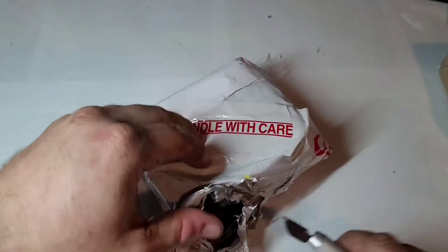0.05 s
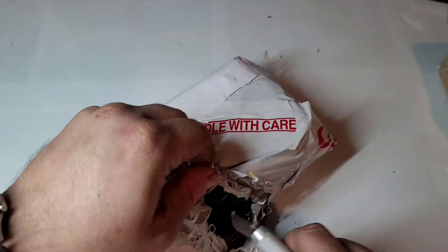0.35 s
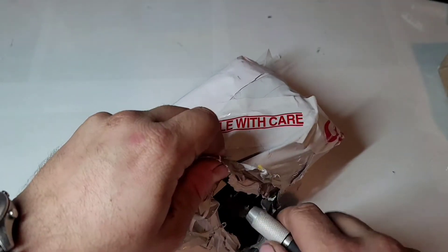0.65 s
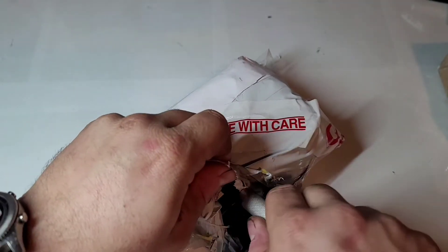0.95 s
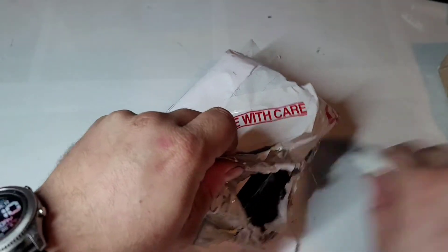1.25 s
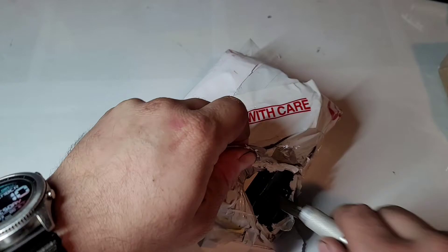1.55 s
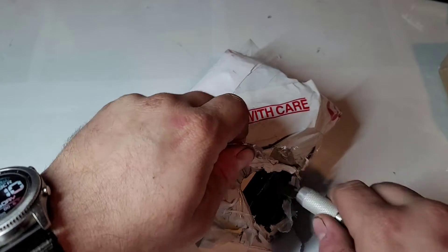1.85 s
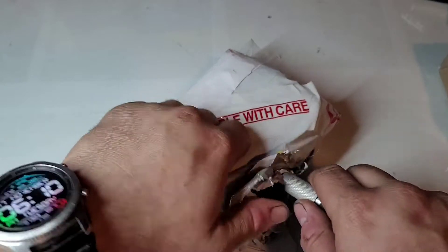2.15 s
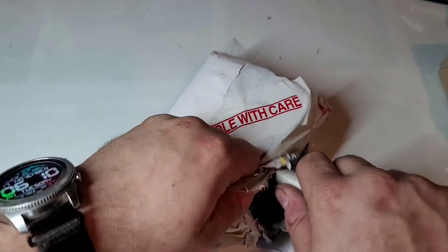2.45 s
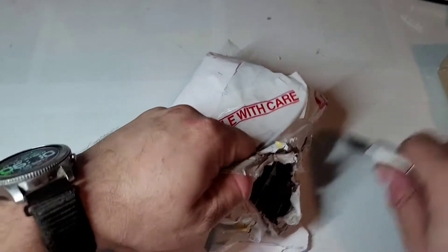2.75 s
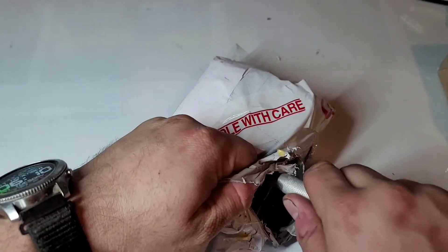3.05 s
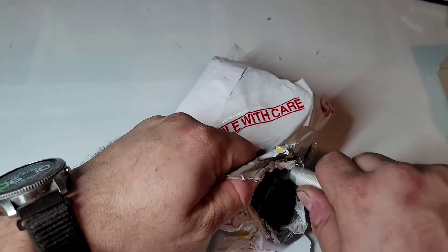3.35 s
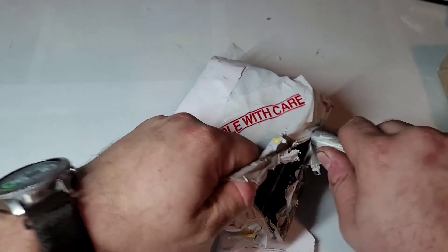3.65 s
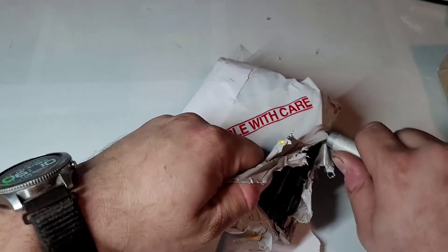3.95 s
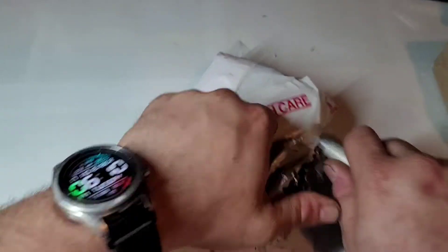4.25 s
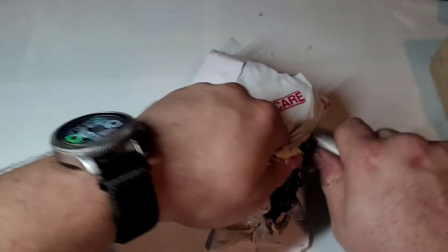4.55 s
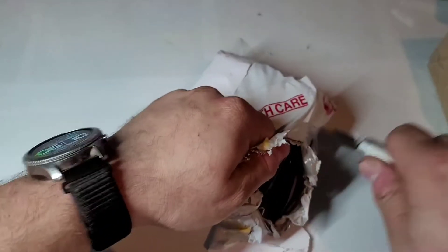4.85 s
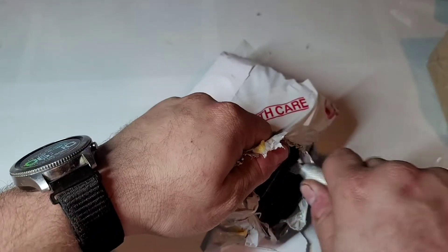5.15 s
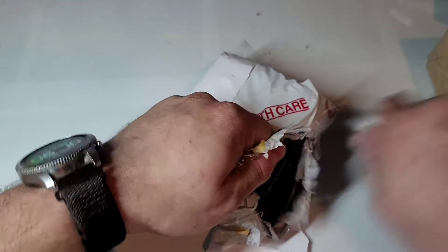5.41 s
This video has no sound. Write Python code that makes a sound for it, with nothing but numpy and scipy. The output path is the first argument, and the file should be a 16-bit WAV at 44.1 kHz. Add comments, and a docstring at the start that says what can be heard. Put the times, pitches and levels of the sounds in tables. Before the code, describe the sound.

A hand grips a padded plastic mailer on a table, making it crinkle unevenly, while a craft knife ticks and scrapes through the stiff padding. Several times the blade hooks the wrapping and pulls until it breaks in a short, sharp rip with a hollow knock. The crackling gets busier in the second half, and two strong rips come near the end. The sound is close, in a small, bare, quiet room.

```python
"""In a small bare room, a padded plastic mailer is held on a table and cut open with a craft knife.
Under the hand the film crinkles by buckling; the blade scrapes and ticks through the card-like padding
by stick-slip friction. Again and again the wrapping fractures in a short rip, an impulse that excites
the resonances of the hollow parcel, thumps the table and reverberates over the room's quiet hush."""
import sys
import numpy as np
from scipy import signal
from scipy.fft import rfft, irfft
from scipy.io import wavfile
from scipy.ndimage import map_coordinates

SR = 44100
rng = np.random.default_rng(int(sys.argv[2]) if len(sys.argv) > 2 else 0)


def int16_out(signal):
    """Quantize to a 16-bit WAV file."""
    q = np.round(np.clip(np.atleast_2d(signal).T, -1, 1) * 32767)
    wavfile.write(sys.argv[1], SR, q.astype(np.int16))


N = 246078
TIME = np.arange(N) / SR

# Spectra of the room's air, its reverberation, the film's crinkle, a single tick and the padding's rasp.
# Each row: frequency in Hz, relative spectral level in dB.
HUSH_SPECTRUM = [(25, 1), (50, 8), (88, 15), (125, -2), (250, 10.5), (500, -4), (1200, -13.5), (3000, 1),
                 (6000, -15), (9000, -59), (15000, -35)]
ROOM_SPECTRUM = [(50, -5), (90, -4), (130, -3.5), (250, 0), (600, 1.5), (1000, -4.5), (1450, 0),
                 (2000, 2.5), (2800, 6.5), (3700, 3.5), (5000, -3), (6500, 2), (9000, 1), (15000, -5)]
CRINKLE_SPECTRUM = [(60, -9), (200, -3), (450, 1.5), (750, -2.5), (1100, -15.5), (2000, -1.5), (3200, 3.5),
                    (6800, -3.5), (8200, -5.5), (9600, -9.5), (12000, -8), (15000, -18.5)]
TICK_SPECTRUM = [(100, -31), (900, -5.5), (2000, 16.5), (3200, 18.5), (6800, 8), (8200, 7), (9600, 3.5),
                 (12000, 5.5), (15000, 0)]
RASP_SPECTRUM = [(100, -55.5), (350, -15), (700, -4), (980, -11), (1220, -1.5), (1650, -1.5), (2300, -7.5),
                 (3500, -19.5), (8000, -32), (15000, -50)]
# Reverberation time. Each row: frequency in Hz, time to decay by 60 dB in seconds.
REVERB_TIMES = [(100, 0.61), (300, 0.46), (1500, 0.68), (3600, 0.85), (7000, 0.58), (9500, 0.46),
                (13000, 0.38)]
# Standing waves of the room. Each row: frequency in Hz, relative level in dB.
STANDING_WAVES = [(89, 9.5), (155, 9.5), (219, 10.5), (392, -33), (613, -18), (866, 6.5)]
# Resonances of the hollow parcel. Each row: frequency in Hz, bandwidth in Hz, relative level in dB.
PARCEL_MODES = [(276.5, 14, -14), (431, 224, 12.5), (596, 104, 6.5)]
# Resonances of the padding. Each row: multiple of the main pitch, bandwidth in Hz, relative level in dB.
PADDING_MODES = [(0.421, 194, -3), (0.702, 220, -2), (1.001, 305, 11), (1.27, 500, -23), (1.85, 600, -30)]
# Resonances of the thin blade. Each row: frequency in Hz, time to decay by 60 dB in seconds, level in dB.
BLADE_MODES = [(4310, 0.086, -50), (11040, 0.034, -47)]
# The table's response to a break. Each row: frequency in Hz, offset from the break's knock level in dB.
TABLE_THUMP = [(92, -21.5), (290, -21)]
# Patches of film. Each row: resonance in Hz, delay to the left microphone in samples.
FILM_PATCHES = [(2500, 8), (3400, 6), (4400, 7), (5700, 4), (6900, 9), (11500, 6)]
# The parcel nudges the table. Each row: start in seconds, pitch in Hz, relative level in dB.
NUDGES = [(0.689, 184, -56.5), (0.822, 92, -54.5), (2.632, 92, -48), (3.535, 220, -50), (3.55, 111, -50.5),
          (3.63, 90, -51), (4.172, 177, -57), (4.311, 96, -56.5), (4.449, 248, -51.5), (4.478, 181, -51.5)]
# The parcel slides under the hand. Each row: start in seconds, length in seconds, level in dB.
SLIDES = [(.015, 0.31, -64), (0.653, 0.22, -64.5), (1.132, 0.045, -65), (1.72, 0.039, -47.5),
          (2.01, 0.11, -58), (3.62, 0.048, -47.5), (3.863, 0.033, -55.5), (4.575, 0.018, -54.5),
          (4.655, 0.03, -41.5)]
# The holding hand keeps the film astir. Each row: time in seconds, crinkle level in dB.
GRIP_LEVELS = [(0, -59), (.5, -71), (1.05, -70.5), (1.7, -80), (1.93, -77), (2.15, -64), (2.58, -57.5),
               (2.9, -75), (3.52, -80), (3.72, -65), (4.08, -61), (4.6, -60), (5.05, -79.5), (5.41, -65.5)]
# The hand squeezes. Each row: peak time in seconds, rise and fall time in seconds, crinkle level in dB.
HAND_SQUEEZES = [(0.011, 0.15, -52.5), (0.237, 0.24, -57), (0.706, 0.19, -60), (0.953, 0.035, -53),
                 (1.74, 0.045, -47), (2.044, 0.12, -51), (2.153, 0.11, -50), (2.341, .17, -50),
                 (3.888, 0.069, -46), (4.207, 0.079, -44.5), (4.392, 0.11, -51.5), (4.524, 0.085, -46),
                 (5.343, .1, -58.5)]
# The blade drags through the padding. Each row: start and length in seconds,
# relative scrape and crinkle levels in dB.
BLADE_DRAGS = [(1.088, 0.0608, -47, -54), (1.161, .048, -37, -42), (3.308, 0.051, -65, -79),
               (3.502, .012, -48.5, -60.5), (4.579, .012, -50, -69)]
# The blade hooks the wrapping and pulls until it tears. Each row: bite and end in seconds,
# relative crinkle and scrape levels during the pull in dB.
BLADE_PULLS = [(1.258, 1.33, -48.5, -51.5), (2.615, 2.691, -43, -47), (3.596, 3.652, -47, -44),
               (4.651, 4.729, -45, -48), (5.434, 5.505, -43.5, -47)]
# Creases flip in the film. Each row: time in seconds, tick level in dB, tick pitch in Hz.
CREASE_FLIPS = [(.065, -50, 7160), (.0949, -48.5, 6900), (.3755, -47, 3180), (.6291, -43.5, 4400),
                (.8308, -45, 6300), (1.6984, -50.5, 3150), (1.9537, -50.5, 4333), (2.13, -49, 6410),
                (2.338, -46, 4100), (2.356, -45, 6340), (2.4323, -46.5, 12400), (2.6141, -41.5, 6194),
                (2.6667, -33.5, 13300), (3.865, -34.5, 4060), (3.8929, -41, 6800), (4.7191, -34, 5450),
                (5.2731, -51, 3420), (5.4296, -39, 6700), (5.5068, -26, 6070)]
# The blade tip catches in the padding. Each row: time in seconds, relative clack level in dB,
# clack pitch in Hz, tick level in dB.
TIP_CATCHES = [(0.0283, -43.5, 760, -49), (.557, -48, 2770, -50), (0.6105, -45, 1630, -53.5),
               (0.6709, -50, 776, -53.5), (1.0782, -39, 2290, -42.5), (1.0855, -30, 2680, -50),
               (1.1648, -37, 1200, -42.5), (1.2728, -35.5, 1930, -37.5), (1.8433, -43.5, 1240, -46.5),
               (1.88, -44.5, 1900, -55), (2.4672, -42, 1380, -51.5), (2.533, -43, 1120, -35),
               (2.545, -39.5, 1310, -44.5), (2.6245, -39.5, 1220, -39), (3.2286, -40.5, 1170, -44),
               (3.29, -17.5, 1243, -34), (3.3024, -29.5, 1540, -54), (3.5944, -33.5, 1292, -55),
               (3.767, -42.5, 1240, -50), (3.9797, -48, 1060, -70), (4.023, -43.5, 1120, -44),
               (4.3436, -37.5, 1298, -44.5), (4.4, -33.5, 2260, -46.5), (4.4418, -41.5, 1320, -57),
               (4.5193, -31.5, 1286, -40), (4.6506, -35.5, 1250, -43), (4.667, -36, 1240, -56),
               (5.4, -45, 1150, -68), (5.4365, -36, 1240, -40), (5.4708, -43, 2534, -35.5)]
# A deeper catch dulls the tick. Each row: the catch's clack level minus tick level in dB, tick pitch in Hz.
TICK_DULLING = [(5, 9100), (13, 1900)]
# The wrapping breaks. Each row: time in seconds, film tick level in dB, relative padding clack level
# in dB, clack pitch in Hz, relative parcel knock level in dB, knock pitch in Hz.
FRACTURES = [(1.3215, -31, -25, 1446, -28.5, 410), (1.3299, -29, -26.5, 890, -27, 375),
             (2.0119, -42, -45, 960, -39, 453), (2.6831, -49, -24, 1340, -20.5, 364),
             (2.6911, -52.5, -26.5, 1030, -30.5, 334), (3.8787, -55, -46.5, 900, -53, 430),
             (4.176, -39.5, -48, 1590, -44.5, 420), (4.2036, -57, -40, 1322, -43, 419),
             (4.7078, -33, -36, 920, -35, 400.7), (4.7273, -27, -21, 1400, -50, 457),
             (4.7315, -22, -33, 910, -20.5, 447), (5.4921, -22, -17.5, 1344, -22.5, 496),
             (5.5067, -35.5, -28, 2070, -22.5, 465)]

LEFT_LAG = 7  # samples
SNAP_GAIN = np.sqrt(.005 * SR)  # a snap's level is its energy averaged over 5 ms


def undb(db):
    """Amplitude ratio of a level in decibels."""
    return 10 ** (np.asarray(db) / 20)


def together(levels_db):
    """Incoherent sources add in power: their joint level in dB."""
    return 10 * np.log10(np.sum(undb(levels_db) ** 2, axis=0) + 1e-14)


def unit_rms(x):
    """Normalise to a mean power of one."""
    return x / np.sqrt(np.mean(x ** 2))


def unit_energy(x):
    """Normalise a short response to an energy of one."""
    return x / np.sqrt(np.sum(x ** 2))


def lookup(table, hz):
    """Interpolate rows of (Hz, value) along a log-frequency axis."""
    table_hz, value = np.transpose(table)
    return np.interp(np.log(np.maximum(hz, 1)), np.log(table_hz), value)


def colour(spectrum, size=2048):
    """Minimum-phase impulse response with the given spectrum."""
    cepstrum = irfft(np.log(undb(lookup(spectrum, np.fft.rfftfreq(size, 1 / SR)))))
    cepstrum[1:size // 2] *= 2
    cepstrum[size // 2 + 1:] = 0
    return unit_energy(irfft(np.exp(rfft(cepstrum))))


def ring(modes, size=2048):
    """Modal response: damped sinusoids (Hz, bandwidth in Hz, dB), each swelling for about half a cycle."""
    t, out = TIME[:size], 0
    for hz, width, db in modes:
        envelope = (1 - np.exp(-2 * hz * t)) ** 2 * np.exp(-np.pi * width * t)
        out = out + undb(db) * unit_energy(envelope * np.sin(2 * np.pi * hz * t))
    return unit_energy(out)


def through(x, response):
    """Linear filtering: convolve a sound with an impulse response."""
    return signal.fftconvolve(x, response)[:len(x)]


def add(track, s, sound):
    """Superposition: mix a short sound into a track at s seconds."""
    start = int(np.clip(s * SR, 0, N - 1))
    track[..., start:start + sound.shape[-1]] += sound[..., :N - start]


def place(x, right_db, lag=LEFT_LAG):
    """Level and time differences give direction: the left microphone hears x `lag` samples later."""
    return np.array([np.pad(x, (lag, 0))[:len(x)] * undb(-right_db / 2), x * undb(right_db / 2)])


def clicks(rate, spread_db):
    """Poisson process of tiny fractures, a few much larger than the rest; power is independent of rate."""
    size = undb(spread_db * np.minimum(rng.exponential(size=N), 4))
    occurs = rng.random(N) < rate / SR
    return unit_rms(occurs * size * rng.choice([-1, 1], N) / np.sqrt(rate))


def stick_slip(rate, depth_db):
    """Uneven friction: a factor that moves to a new random value about `rate` times a second."""
    knots = np.cumsum(rng.exponential(size=4000)) / rate
    return unit_rms(undb(depth_db * np.interp(TIME, knots, rng.standard_normal(len(knots)))))


def diffuse_field(size, coherent_hz=650, bass_coherence=0.79):
    """Noise spectra at two microphones in a diffuse field: coherence falls as frequency rises."""
    hz = np.fft.rfftfreq(size, 1 / SR)
    mid, side = rfft(rng.standard_normal((2, size)))
    coherence = bass_coherence / (1 + (hz / coherent_hz) ** 2)
    mid, side = mid * np.sqrt(1 + coherence), side * np.sqrt(1 - coherence)
    return hz, np.array([mid + side, mid - side]) / np.sqrt(2)


def hush(db=-68):
    """Diffuse ambient noise: the room's quiet air with a low rumble."""
    hz, noise = diffuse_field(N)
    return undb(db) * unit_rms(irfft(noise * undb(lookup(HUSH_SPECTRUM, hz)), N))


def reverberation(x, first_s=0.0077, build_s=0.0022, standing_gain=0.11, standing_t60=0.55):
    """Wall reflections merge into a tail, each band decaying at its own rate; standing waves hum in it."""
    hz, noise = diffuse_field(SR)
    noise = noise * undb(lookup(ROOM_SPECTRUM, hz))
    t, tail = TIME[:SR], 0
    edges = np.linspace(5, np.sqrt(SR / 2), 24) ** 2
    for low, high in zip(edges, edges[1:]):
        t60 = lookup(REVERB_TIMES, np.sqrt(low * high))
        band = irfft(noise * ((hz >= low) & (hz < high)))
        tail = tail + band * undb(-60 * t / t60)
    tail = tail * (1 - np.exp(-np.maximum(t - first_s, 0) / build_s))
    width_hz = np.log(1000) / np.pi / standing_t60
    waves = ring([(mode_hz, width_hz, db) for mode_hz, db in STANDING_WAVES], size=SR)
    return np.array([through(x, unit_energy(side) + standing_gain * waves) for side in tail])


def table_echo(pair, delays_s=(.0024, .001892), gain=0.3, above_hz=600):
    """Early reflection: the hard table adds one quick, thin echo to the direct sound at each microphone."""
    thin = signal.sosfilt(signal.butter(2, above_hz, "highpass", fs=SR, output="sos"), pair)
    echoes = [np.interp(TIME - delay, TIME, x, left=0) for x, delay in zip(thin, delays_s)]
    return pair + gain * np.array(echoes)


def table_bumps(rise_cycles=0.63):
    """Heavily damped vibration: each nudge or break sets the table top swinging for a few cycles."""
    out, t = np.zeros(N), TIME[:SR // 4]
    jolts = [(s, hz, knock_db + db) for s, *_, knock_db, _ in FRACTURES for hz, db in TABLE_THUMP]
    for s, hz, db in list(NUDGES) + jolts:
        age = t * hz / rise_cycles
        add(out, s, 2 * undb(db) * age * np.exp(1 - age) * np.sin(2 * np.pi * hz * t))
    return out


def parcel_slides():
    """Frictional excitation: quick small slips on the table make the parcel's resonances grumble."""
    pressure = np.zeros(N)
    for s, length, db in SLIDES:
        add(pressure, s, undb(db) * signal.windows.tukey(int(length * SR), .5))
    return pressure * unit_rms(through(clicks(rate=700, spread_db=0.5), ring(PARCEL_MODES)))


def hand_level(swell_db=21.5):
    """Strain sets the crinkle level in dB: a steady grip, with squeezes that swell and ease off."""
    squeezes = [db - swell_db * np.abs(TIME - s) / length for s, length, db in HAND_SQUEEZES]
    return together([np.interp(TIME, *np.transpose(GRIP_LEVELS))] + squeezes)


def film_crinkle(level_db, ringing=0.067):
    """Buckling: patches of film, each with its own pitch and place, click more densely under strain."""
    out = 0
    clicks_per_s = 650 * undb(.5 * (level_db + 55))
    for hz, lag in FILM_PATCHES:
        response = colour(CRINKLE_SPECTRUM) + ringing * ring([(hz, hz / 4, 0)])
        flurries = clicks(clicks_per_s, spread_db=3.5) * stick_slip(rate=150, depth_db=4.0)
        out = out + place(through(flurries, response), right_db=1.5, lag=lag)
    return unit_rms(out) * undb(level_db)


def blade_ping(start_s=1.8435):
    """Free vibration: the thin blade slips off an edge and rings."""
    out, t = np.zeros(N), TIME[:SR // 4]
    for hz, t60, db in BLADE_MODES:
        add(out, start_s, undb(db - 60 * t / t60) * np.sin(2 * np.pi * hz * t))
    return out


def padding_scrape(level_db, flap_hz, rest_hz=1250):
    """Stick-slip friction: fibre after fibre catches and shakes a flap of padding whose pitch wanders."""
    fibres = clicks(rate=1300, spread_db=2.0) * stick_slip(rate=130, depth_db=5.5)
    rasp = through(fibres, colour(RASP_SPECTRUM))
    pitch = flap_hz * stick_slip(rate=45, depth_db=0.5)
    position = np.cumsum(pitch / rest_hz) % N  # reading the rasp faster raises its pitch
    return unit_rms(map_coordinates(rasp, [position], order=3)) * undb(level_db)


def stroke(start, end, fade_db_per_s, bite_db_per_s=899):
    """Envelope of a blade stroke in dB: exponential growth until start, a hold, then decay from end."""
    return -bite_db_per_s * np.maximum(start - TIME, 0) - fade_db_per_s * np.maximum(TIME - end, 0)


def knife_levels(run_s=.029, run_crinkle_db=15.5, run_scrape_db=8):
    """Crinkle and scrape levels in dB: drags cut evenly, while pulls end in a runaway fracture."""
    film, rasp = [], []
    for s, length, scrape_db, crinkle_db in BLADE_DRAGS:
        shape = stroke(s, s + length, fade_db_per_s=328)
        film.append(crinkle_db + shape)
        rasp.append(scrape_db + shape)
    for bite, end, crinkle_db, scrape_db in BLADE_PULLS:
        shape = stroke(bite, end, fade_db_per_s=520)
        run = np.clip(1 - (end - TIME) / run_s, 0, 1)
        film.append(crinkle_db + shape + run_crinkle_db * run)
        rasp.append(scrape_db + shape + run_scrape_db * run)
    return together(film), together(rasp)


def snap_events(hand_db, break_tick_hz=3300, strays=60, spread_db=3):
    """Sudden releases of strain. Each row: seconds, tick dB, tick Hz, clack dB, clack Hz."""
    rows = [(s, tick_db, break_tick_hz, db, hz) for s, tick_db, db, hz, _, _ in FRACTURES]
    for s, clack_db, clack_hz, tick_db in TIP_CATCHES:
        tick_hz = np.interp(clack_db - tick_db, *np.transpose(TICK_DULLING))
        rows.append((s, tick_db, tick_hz, clack_db, clack_hz))
    # Small stray snaps come at random moments, as strong as the hand's work.
    moments = (np.arange(strays) + rng.random(strays)) / strays * TIME[-1]
    for s in moments:
        tick_size, tick_pitch, clack_size, clack_pitch = rng.uniform(-0.9, 1, 4)
        db = hand_db[int(s * SR)]
        tick = (db + 6.5 + spread_db * tick_size, 6000 * 2 ** (tick_pitch / 2))
        clack = (db + 2.0 + spread_db * clack_size, 1200 * 2 ** (clack_pitch / 2))
        rows.append((s, *tick, *clack))
    return rows


def facet(hz, width_hz=2600, lift_db=4.0):
    """Impulse response of a facet of film: a broadband crack with a weak resonance at hz."""
    grid = np.geomspace(50, SR / 2, 60)
    hump = lift_db / (1 + (2 * (grid - hz) / width_hz) ** 2)
    return colour(np.transpose([grid, lookup(TICK_SPECTRUM, grid) + hump]))


def film_ticks(snaps, splinter_s=0.0022, splinter_gain=0.51, size=2048):
    """Impulsive release: each snap or crease flip clicks and briefly splinters at its own spot."""
    out = np.zeros((2, N))
    for s, db, hz, *_ in snaps + list(CREASE_FLIPS):
        noise = rng.standard_normal(size)
        crack = splinter_gain * noise * np.exp(-TIME[:size] / splinter_s)
        crack[0] += 1
        tick = SNAP_GAIN * undb(db) * unit_energy(through(crack, facet(hz)))
        lag_shift, side = np.clip(noise[-2:], -2, 2)
        add(out, s, place(tick, right_db=4 + 4 * side, lag=LEFT_LAG + round(lag_shift)))
    return out


def padding_clacks(snaps):
    """Impact excitation: each snap rings the stiff padding's well-damped modes."""
    out = np.zeros(N)
    for s, _, _, clack_db, clack_hz in snaps:
        modes = [(ratio * clack_hz, width, db) for ratio, width, db in PADDING_MODES]
        add(out, s, SNAP_GAIN * undb(clack_db) * ring(modes))
    return out


def parcel_knocks():
    """Cavity resonance: each break jolts the hollow parcel, its modes scaled to that knock's pitch."""
    out, main_hz = np.zeros(N), PARCEL_MODES[1][0]
    for s, *_, knock_db, knock_hz in FRACTURES:
        modes = [(hz * knock_hz / main_hz, width, db) for hz, width, db in PARCEL_MODES]
        add(out, s, SNAP_GAIN * undb(knock_db) * ring(modes))
    return out


def scene():
    """Superposition of the direct sound of film, padding and parcel, its reflections and the hush."""
    hand_db = hand_level()
    tear_db, scrape_db = knife_levels()
    snaps = snap_events(hand_db)
    ticks = film_ticks(snaps)
    film = film_crinkle(together([hand_db, tear_db])) + ticks
    sag_octaves = 0.02 * np.maximum(scrape_db + 50, 0)  # the pitch drops as the blade bears down
    cutting = padding_scrape(scrape_db, flap_hz=1400.4 * 2 ** -sag_octaves)
    rubbing_db = -64 + 0.58 * (hand_db + 59.5)  # the padding rubs along as the hand works
    rubbing = padding_scrape(rubbing_db, flap_hz=943)
    impacts = undb(-3) * padding_clacks(snaps) + undb(-1.5) * parcel_knocks() + undb(-1) * table_bumps()
    body = undb(2) * (cutting + rubbing) + impacts + parcel_slides()
    direct = film + place(blade_ping(), right_db=7) + place(body, right_db=-0.4)
    return table_echo(direct) + undb(-7.5) * reverberation(direct.mean(axis=0)) + hush()


def record(dry, low_hz=30, top_hz=14900):
    """Band limiting: the phone thins the deep bass and cuts the top of the treble."""
    thinned = signal.sosfilt(signal.butter(2, low_hz, "highpass", fs=SR, output="sos"), dry)
    return signal.sosfilt(signal.ellip(8, .2, 70, top_hz, fs=SR, output="sos"), thinned)


dry = scene()
out = record(dry)
int16_out(out)
```